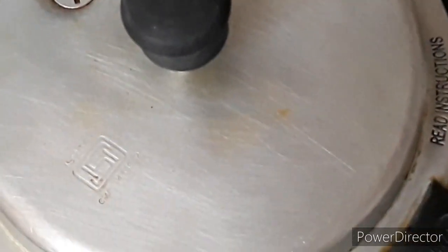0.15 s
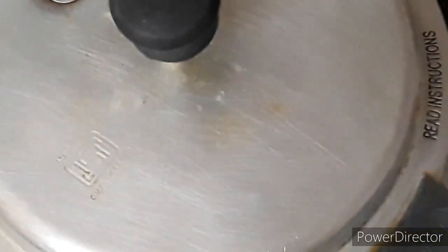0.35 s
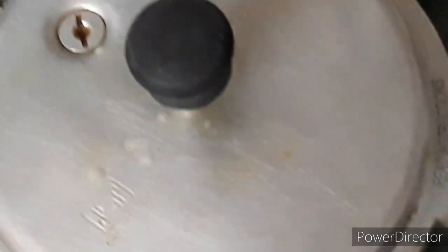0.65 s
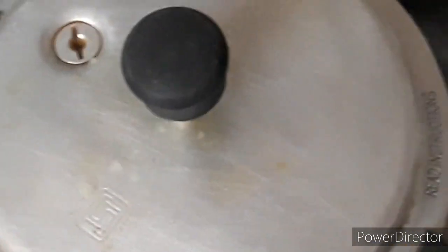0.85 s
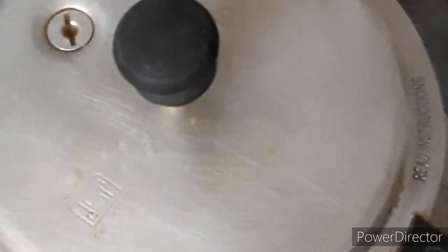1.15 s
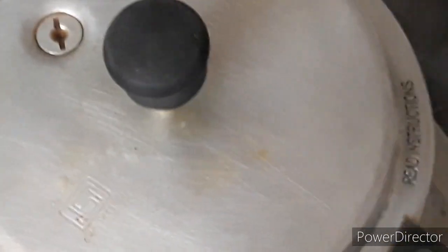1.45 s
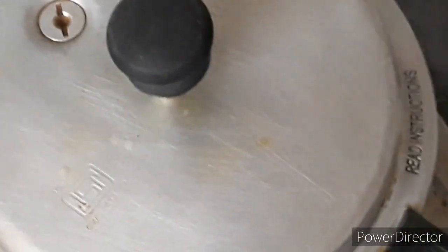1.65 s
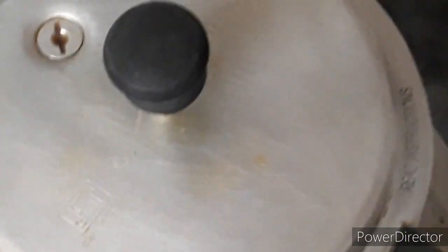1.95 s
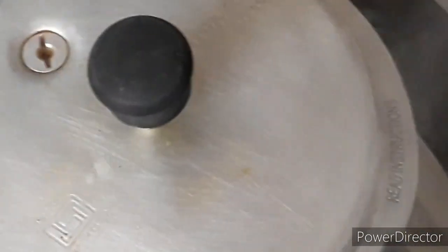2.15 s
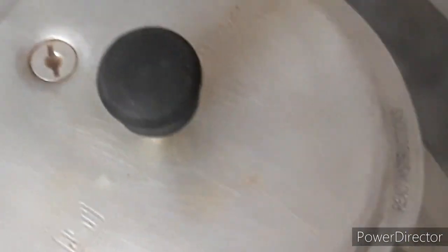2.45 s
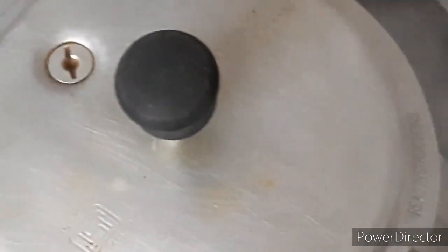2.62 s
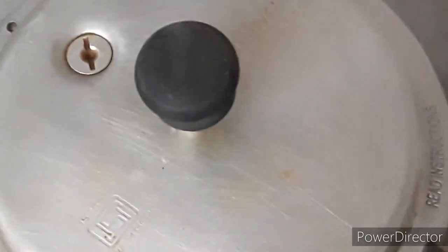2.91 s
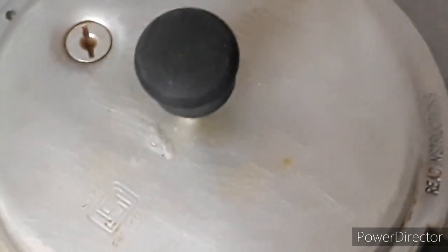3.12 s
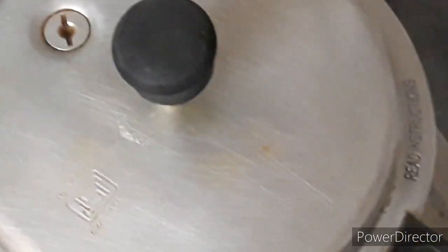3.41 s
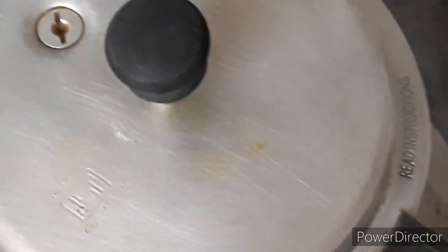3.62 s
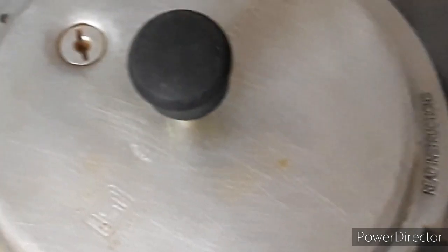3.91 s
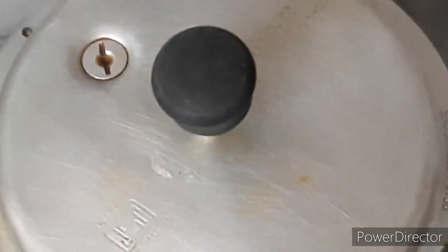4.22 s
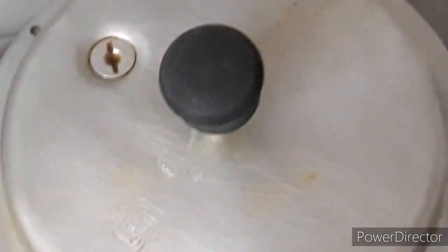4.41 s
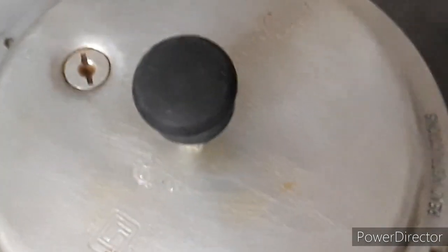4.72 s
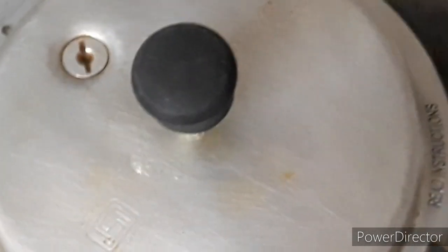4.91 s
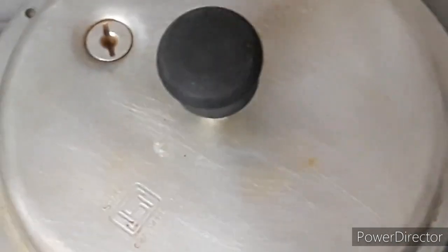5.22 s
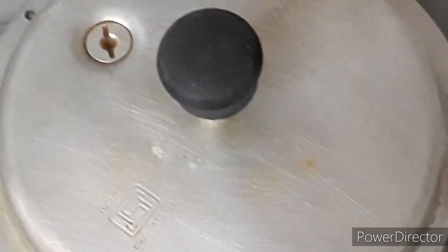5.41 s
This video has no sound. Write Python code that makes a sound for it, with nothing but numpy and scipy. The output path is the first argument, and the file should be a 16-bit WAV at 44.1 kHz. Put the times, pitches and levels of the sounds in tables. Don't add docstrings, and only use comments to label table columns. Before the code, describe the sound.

A faint leak pinches off, then with a tap and metallic clacks a pressure cooker bursts into a loud, steady, bright steam hiss.

```python
import sys
import numpy as np
from scipy import signal
from scipy.fft import rfft, irfft, next_fast_len
from scipy.io import wavfile
from scipy.ndimage import uniform_filter1d

SR = 44100
rng = np.random.default_rng(int(sys.argv[2]) if len(sys.argv) > 2 else 0)


def wav_record(signal):
    frames = np.transpose(np.atleast_2d(signal))
    bounded = np.clip(frames, -1, 1)
    quanta = np.round(bounded * 32767).astype(np.int16)
    wavfile.write(sys.argv[1], SR, quanta)


def voltage_ratio(decibels):
    exponent = np.asarray(decibels, float) / 20
    return 10 ** exponent


N = 245195
T = np.arange(N) / SR


def unit(x):
    return x / np.sqrt(np.mean(x ** 2))


def shape(x, gain):
    size = next_fast_len(len(x))
    hz = np.arange(size // 2 + 1) * SR / size + 1e-3
    return irfft(rfft(x, size) * gain(hz), size)[:len(x)]


def colour(points):
    hz, db = np.transpose(points)
    return lambda f: voltage_ratio(np.interp(np.log(f), np.log(hz), db))


def hump(hz, octaves):
    return lambda f: np.exp(-.5 * (np.log2(f / hz) / octaves) ** 2)


def above(f, hz):
    return 1 / (1 + (hz / f) ** 12)


def bump(s, before_s, after_s):
    return np.exp(-.5 * ((T - s) / np.where(T < s, before_s, after_s)) ** 2)


def walk(rate, size=N):
    k = int(SR / rate)
    steps = np.repeat(rng.standard_normal(size // k + 1), k)
    return 0.71 * uniform_filter1d(uniform_filter1d(steps, k), k)[:size]


# frequency in Hz, level in dB per Hz.
RUMBLE = [(20, -40), (45, -20), (95, -8), (130, -19), (170, -29), (300, -24), (500, -16), (700, -18),
          (950, -26), (1500, -30), (3000, -50)]
# frequency in Hz, level in dB.
FAN = [(86, -69), (538, -62)]


def kitchen():
    rumble_db, duck_db, duck_s = -60.5, -9.5, .12
    noise = unit(shape(rng.standard_normal(N), colour(RUMBLE)))
    rumble = voltage_ratio(rumble_db + 1.5 * walk(4.4)) * noise
    hum = sum(voltage_ratio(db + 1.5 * walk(6.6)) * np.sin(2 * np.pi * hz * T) for hz, db in FAN)
    duck = duck_db * (0.5 - np.exp(-np.maximum(T - .4, 0) / duck_s))
    return (rumble + hum) * voltage_ratio(duck)


# start in seconds, length in seconds, from Hz, to Hz, level in dB.
SQUEAKS = [
    (3.33, .17, 590, 535, -51),
    (4.98, .1, 540, 530, -54),
    (2.42, .08, 600, 510, -56),
]


def squeaks():
    out = np.zeros(N)
    for s, length, from_hz, to_hz, db in SQUEAKS:
        u = np.clip((T - s) / length, 0, 1)
        hz = to_hz + (from_hz - to_hz) * (1 - u) ** 2
        out += voltage_ratio(db) * np.sin(np.pi * u) * np.sin(2 * np.pi * np.cumsum(hz) / SR)
    return out


def knocks(events, modes, t60, rise_cycles, rough_db):
    out, t = np.zeros(N + SR), T[:SR // 2]
    for s, thud_db, hz, octaves, ring_db in events:
        thud = unit(shape(rng.standard_normal(len(t)), hump(hz, octaves)))
        blow = voltage_ratio(thud_db) * thud * (1 - np.exp(-t / 0.003)) * voltage_ratio(-60 * t / t60)
        for f, db, fade in modes:
            rise = 1 - np.exp(-t * f / rise_cycles)
            uneven = rough_db * walk(40, size=len(t))
            swell = rise * voltage_ratio(ring_db + db + uneven - 60 * t / fade)
            blow = blow + swell * np.sin(2 * np.pi * (f * t + rng.random()))
        start = int(s * SR)
        out[start:start + len(t)] += blow * np.minimum(1, 10 * (1 - t / t[-1]))
    return out[:N]


# start in seconds, thud in dB, thud centre in Hz, width in octaves, ring in dB.
THUDS = [
    (.202, -35, 450, .8, -39),
    (1.56, -46.5, 300, 1.2, -52),
    (2.178, -44.5, 400, 1.1, -44),
    (3.02, -52, 130, 1.0, -62),
    (3.6, -50, 200, 1.0, -60),
    (3.93, -50, 300, .5, -54),
    (4.19, -52, 450, .5, -64),
    (4.757, -54, 350, .5, -43),
]
# frequency in Hz, level in dB, 60 dB decay in seconds.
HOUSE = [(88, -7, .9), (205, -10, .5), (257, -7, .6), (346, 0, .7), (458, -9, .5), (690, -9, .3)]


def thuds():
    return knocks(THUDS, HOUSE, t60=.5, rise_cycles=4, rough_db=4)


# start in seconds, thud in dB, thud centre in Hz, width in octaves, ring in dB.
CLACKS = [
    (.315, -36, 1000, .4, -50),
    (.35, -30, 800, .8, -31),
    (.415, -34, 850, .3, -41),
    (2.495, -29, 850, .6, -39),
    (2.54, -34, 900, .4, -46),
]
# frequency in Hz, level in dB, 60 dB decay in seconds.
POT = [(90, -16, .6), (275, -15, .4), (390, -4, .4), (528, -9, .4), (690, -4, .5), (802, 0, .7),
       (904, -2, .55), (1017, -3, .5)]


def clacks():
    return knocks(CLACKS, POT, t60=.38, rise_cycles=3, rough_db=5)


# start in seconds, thud in dB, thud centre in Hz, width in octaves, ring in dB.
CLINKS = [
    (.2, -32, 2800, .5, -31),
]
# frequency in Hz, level in dB, 60
# dB decay in seconds.
DISH = [(257, -9, .9), (2030, 0, .3), (2540, -4, .25), (3230, 2, .25)]


def clinks():
    return knocks(CLINKS, DISH, t60=.2, rise_cycles=8, rough_db=2)


# time in seconds, core level in dB.
LIFT = [
    (0, -34),
    (.045, -34),
    (.145, -40),
    (.19, -36),
    (.207, -27.5),
    (.25, -30),
    (.285, -24),
    (.31, -17),
    (.335, -11.7),
]
# time in
# seconds, core level in dB.
PRESSURE = [(.335, -11.7), (.6, -12.2), (.86, -11.3), (1.22, -12.7), (1.7, -13.5), (1.94, -12),
            (2.18, -11.2), (2.42, -13.5), (2.52, -16), (2.66, -12.4), (2.78, -13.5), (3.45, -13.4),
            (3.62, -12), (3.9, -11.9), (4.1, -13.3), (4.28, -11.9), (4.46, -13.3), (5.56, -13.7)]
# peak in seconds, fade in
# seconds, throat in dB, top in dB.
BURSTS = [
    (.205, .02, 6, -3),
    (.36, .035, 12, 1.5),
    (.52, .015, .1, 4),
    (2.505, .06, 6, .1),
]


def valve():
    usual_blast_db = -12.8
    open_s, open_rise_s = .325, .008
    leak_top_db, open_top_db, top_sag_db_s, top_follow = -11, -8.3, -.3, .45
    wet_db, wet_fade_s = 4, .18
    throat_db, throat_rise_db_s, throat_lift, throat_follow = -26, .2, .62, .15
    upper_db, upper_sag_db_s, upper_follow = -2.8, -.55, .4
    choke_s, choke_db = .44, 2
    lift = np.interp(T, *np.transpose(LIFT))
    lift = lift - lift[-1]
    pressure = np.interp(T, *np.transpose(PRESSURE))
    swell = pressure - usual_blast_db
    opened = .5 + .5 * np.tanh((T - open_s) / open_rise_s)
    throat_burst, top_burst = sum(np.outer(db, bump(s, .012, fade)) for s, fade, *db in BURSTS)
    wet = wet_db * np.exp(-np.maximum(T - open_s, 0) / wet_fade_s)
    open_top = open_top_db + wet + top_sag_db_s * T + (top_follow - 1) * swell
    top = leak_top_db + opened * (open_top - leak_top_db) + top_burst
    throat = throat_db + throat_rise_db_s * T + throat_burst
    throat = throat + (throat_lift - 1) * lift + (throat_follow - 1) * swell
    upper = upper_db + upper_sag_db_s * T + upper_follow * swell * opened
    upper = upper - choke_db * bump(choke_s, .1, .1)
    return pressure + lift, top, throat, upper


# frequency in Hz, width in Hz, level in dB over the hiss.
LID = [(1630, 90, 4), (1800, 35, 2), (1935, 35, 2), (2125, 40, 6), (2165, 30, 5), (2235, 25, 4),
       (2320, 40, 3), (2455, 30, 5), (2526, 35, 4.5), (2610, 50, -6), (2687, 35, 6), (2886, 30, 5),
       (2983, 25, 8), (3125, 30, 4), (3192, 30, 5), (3286, 55, 3), (3571, 30, 3), (3684, 35, 7),
       (3759, 25, 5), (3889, 30, 5), (4028, 25, 4), (4255, 40, 2), (4415, 70, 7), (4549, 50, 3),
       (4660, 30, 3), (4733, 40, 4), (4890, 45, 3), (5415, 60, 3), (9250, 150, -4), (9570, 100, 3)]


def cooker(x, count):
    lid_depth, tiles_t60_s, tiles_db = .95, .35, -6
    t = T[:SR // 2]
    out = 0
    for k in range(count):
        depth = lid_depth * np.clip(1 + .2 * rng.standard_normal(len(LID)), 0, 2)

        def lid_gain(f):
            return voltage_ratio(sum(d * db / (1 + np.square(np.square(2 * (f - hz) / w)))
                           for d, (hz, w, db) in zip(depth, LID)))

        rung = shape(x, lid_gain)
        tail = rng.standard_normal(len(t)) * voltage_ratio(-60 * t / tiles_t60_s) * (t > .002)
        echo = signal.fftconvolve(rung, tail / np.linalg.norm(tail))[:N]
        near = np.clip(1 - np.abs(T / T[-1] * (count - 1) - k), 0, 1)
        out = out + near * rung + voltage_ratio(tiles_db) * np.sin(near * np.pi / 2) * echo
    return out


# frequency in Hz, level in dB per Hz.
JET = [(60, -43.5), (200, -38), (500, -27.5), (750, -24.5), (950, -16.5), (1400, -18), (2000, -11.5),
       (2300, -6), (2850, -5.5), (3150, -2), (3700, 2), (4700, -4), (5500, -10.5), (6300, -14)]
# frequency in Hz, level in dB per Hz.
SPRAY = [(5000, -73), (6300, -59.5), (7500, -62.5), (9000, -65), (9900, -64.5), (10900, -61),
         (11500, -61.5), (13000, -61), (14000, -58.5), (15000, -60), (15600, -64.5)]
# centre in Hz, width in octaves, dB against core, fade in seconds.
GAP = (4430, .09, -15, .4)
# centre in Hz, width in octaves, dB against the core.
LEAK = [(5950, .05, -17), (11200, .035, -23)]


def steam():
    core_db, top_db, throat_db, upper_db = valve()
    flutter_db = .5 * walk(14) + .5 * walk(60)
    hiss = cooker(rng.standard_normal(N) * voltage_ratio(flutter_db), count=4)
    jet = colour(JET)
    throat = unit(shape(hiss, lambda f: jet(f) * (1 - above(f, 1667))))
    lower = unit(shape(hiss, lambda f: jet(f) * (above(f, 1490) - above(f, 3925))))
    upper = unit(shape(hiss, lambda f: jet(f) * (above(f, 4350) - above(f, 6240))))
    top = unit(shape(hiss, lambda f: colour(SPRAY)(f) * above(f, 6700)))
    lower_share = np.sqrt(1 - np.minimum(voltage_ratio(2 * upper_db), .8))
    body = lower_share * lower + voltage_ratio(upper_db) * upper
    edge = voltage_ratio(top_db + 0.28 * walk(16)) * top + voltage_ratio(throat_db + 2.0 * walk(5)) * throat
    gap_hz, octaves, gap_db, fade_s = GAP
    gap_fade = np.exp(-np.abs(T - .4) / np.where(T < .4, .1, fade_s))
    sing = voltage_ratio(gap_db) * unit(shape(hiss, hump(gap_hz, octaves))) * gap_fade
    seated = .5 - .5 * np.tanh((T - .325) / .04)
    leak = seated * sum(voltage_ratio(db) * unit(shape(hiss, hump(hz, wide))) for hz, wide, db in LEAK)
    return voltage_ratio(core_db) * (body + edge + sing + leak)


def scene():
    mix = kitchen() + squeaks() + thuds() + clacks() + clinks() + steam()
    return np.tile(mix, (2, 1))


def roll_off(x):
    return signal.sosfilt(signal.butter(12, 16100, fs=SR, output="sos"), x)


def record(dry):
    top_hz, bass_hz = 15475, 58
    soft = dry / (1 + np.abs(dry) ** 6) ** (1 / 6)

    def band(f):
        return 1 / (1 + (f / top_hz) ** 600) / (1 + (bass_hz / f) ** 4)

    mix = np.array([shape(x, band) for x in soft])
    return roll_off(mix)


dry = scene()
out = record(dry)
wav_record(out)
```